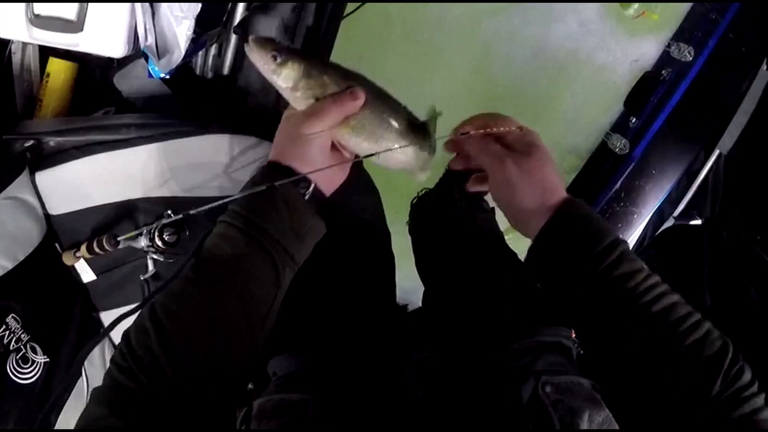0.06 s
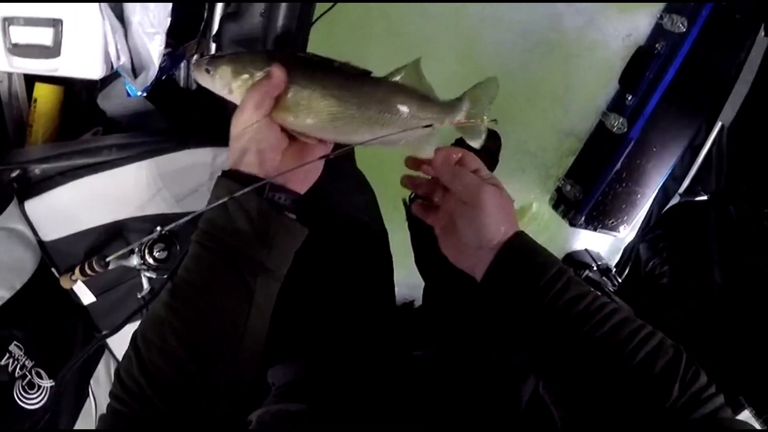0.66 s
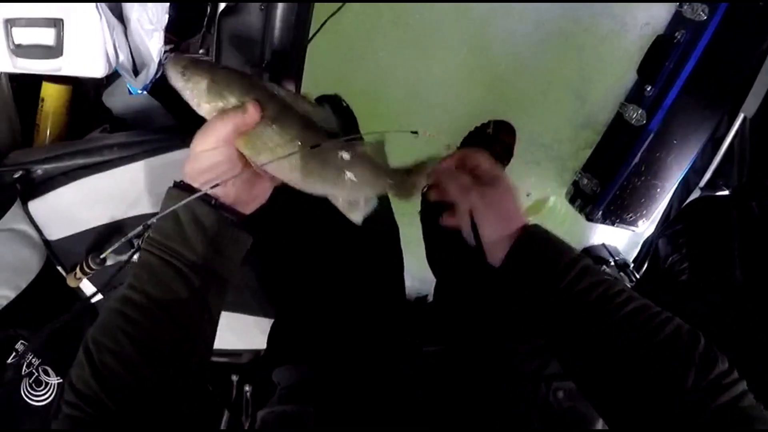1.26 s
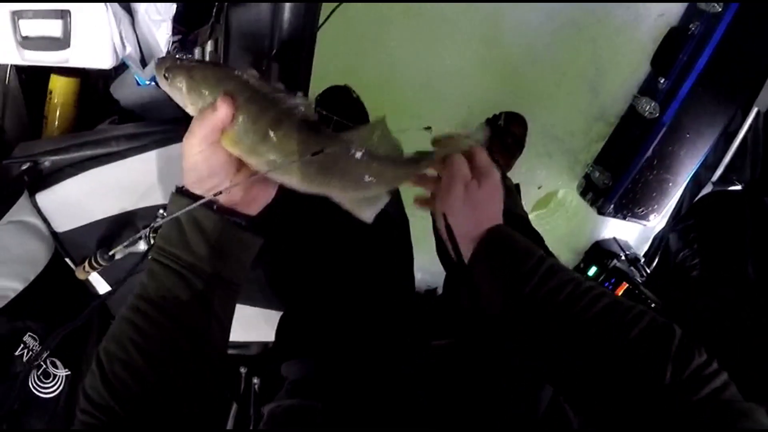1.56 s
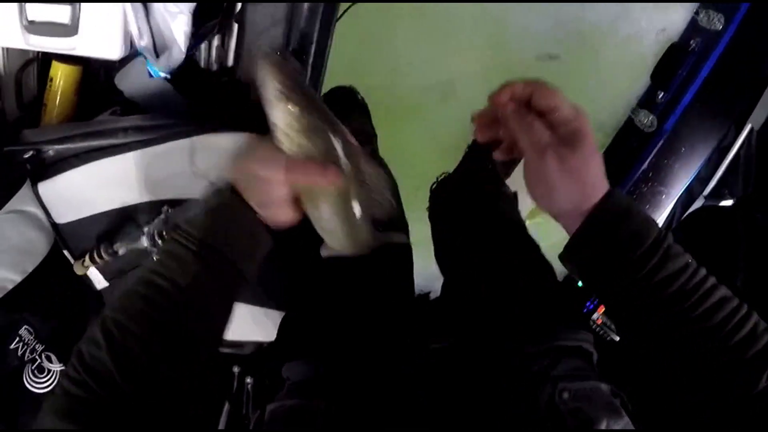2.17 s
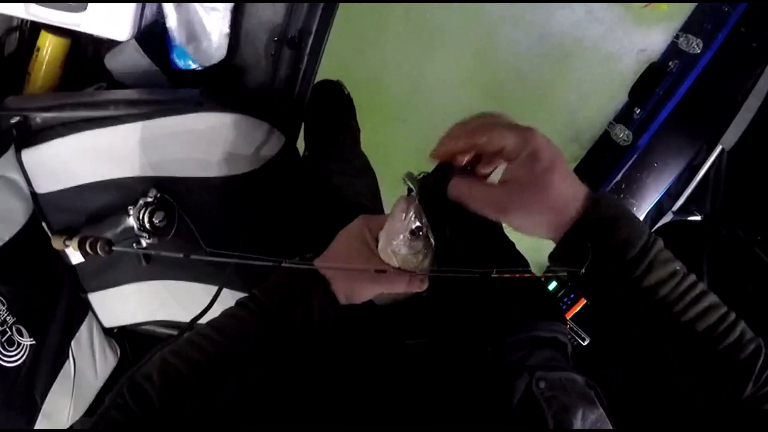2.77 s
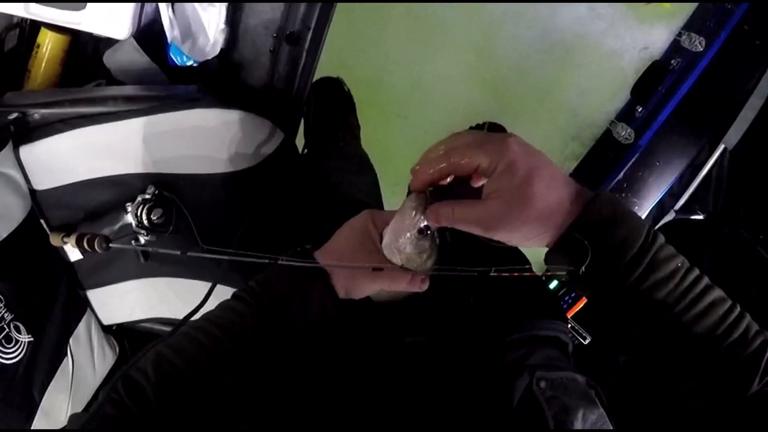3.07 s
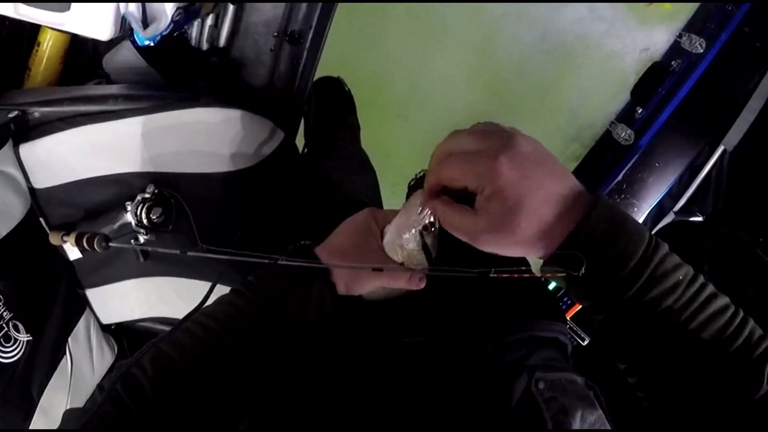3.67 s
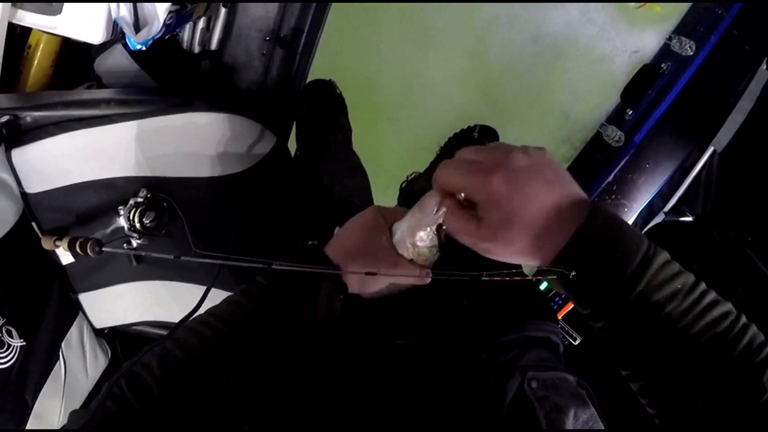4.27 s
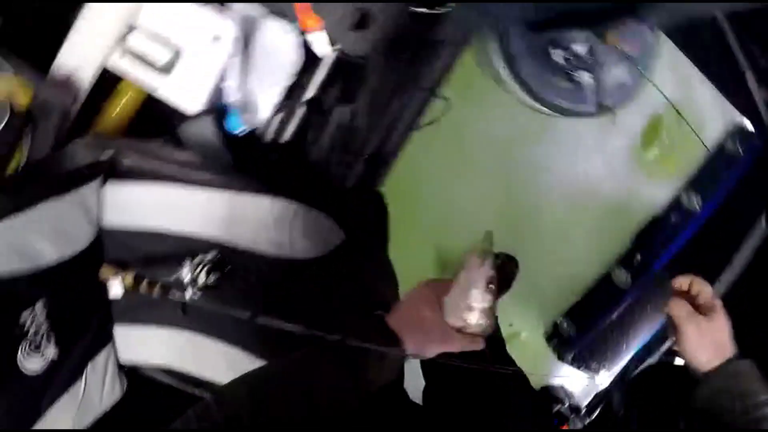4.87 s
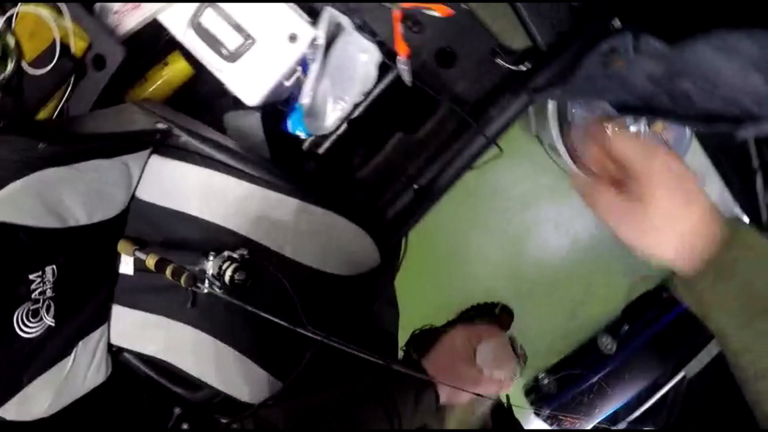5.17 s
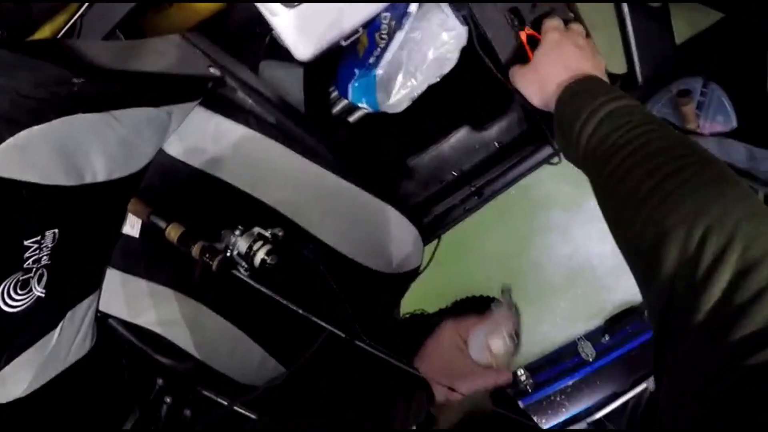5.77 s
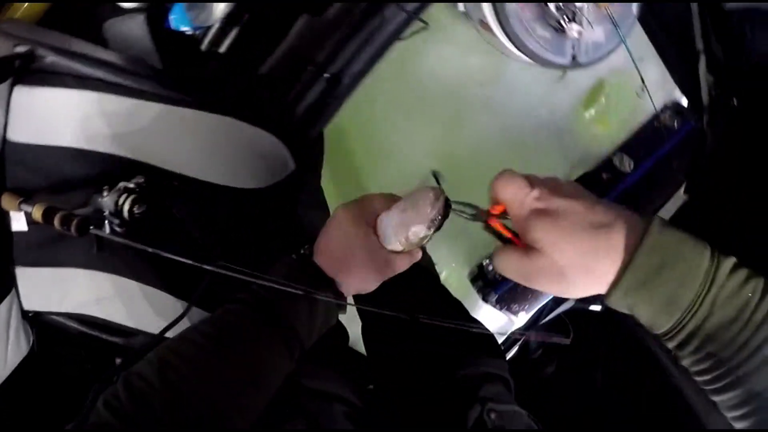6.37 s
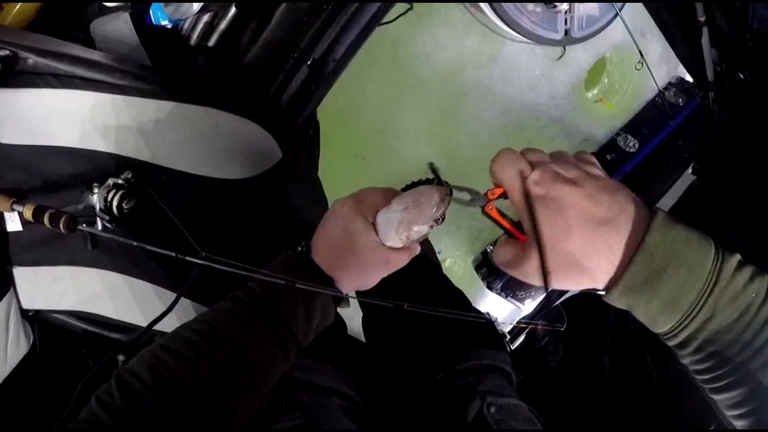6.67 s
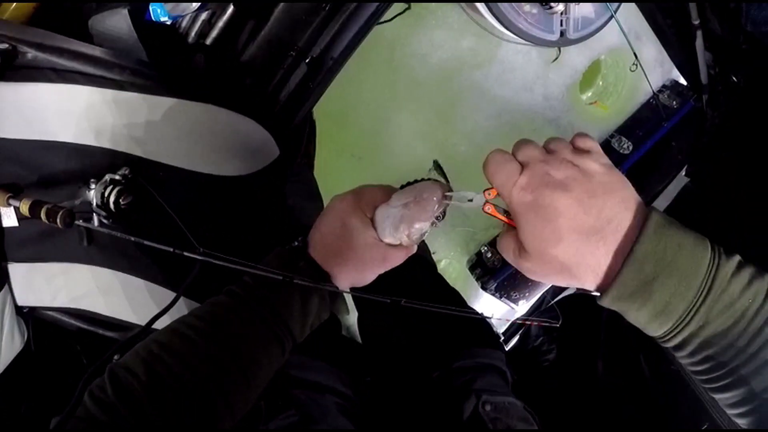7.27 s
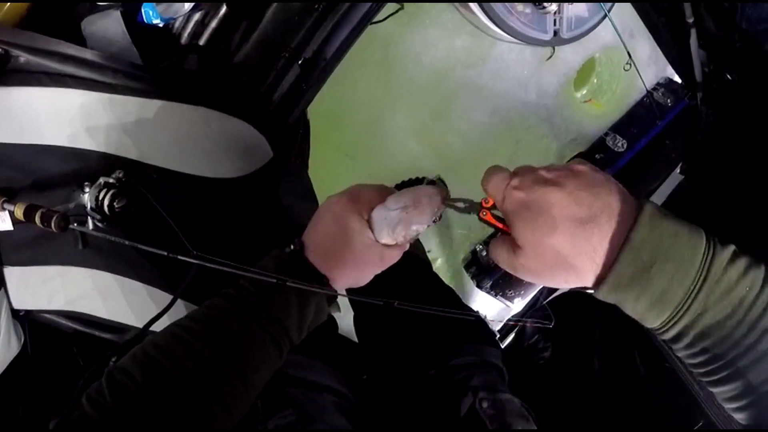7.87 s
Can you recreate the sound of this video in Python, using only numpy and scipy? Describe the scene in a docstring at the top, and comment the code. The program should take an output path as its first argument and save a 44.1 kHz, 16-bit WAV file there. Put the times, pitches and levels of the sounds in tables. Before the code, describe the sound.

Stiff clothing rustles and scuffs right against a body-worn microphone as an angler unhooks a fish in a small shelter. The mount bumps and briefly groans on the cloth, while line and hook give small clicks. Past the middle, pliers scrape and knock on a hollow plastic tray. The handling then thins to a few plier clicks. A low rumble continues throughout.

```python
"""Unhooking a fish in an ice shelter

An angler in a small fabric shelter holds a fish, fetches pliers and works the hook out, over a low rumble.
Stiff clothing rustles and scuffs by a body-worn camera; its mount bumps and groans on the cloth.
Line, hook and pliers click. Scrapes and knocks ring a plastic tray as the pliers are fetched."""
import sys
import numpy as np
from scipy import signal
from scipy.fft import rfft, irfft, next_fast_len
from scipy.io import wavfile
from scipy.ndimage import uniform_filter1d, minimum_filter1d, map_coordinates

SR = 44100
rng = np.random.default_rng(int(sys.argv[2]) if len(sys.argv) > 2 else 0)


def put_to_file(sound):
    """Save the sound as 16-bit audio at rate SR, in the file named by the first command-line argument."""
    columns = np.atleast_2d(sound).T  # one column per channel
    safe = np.clip(columns, -1, 1)
    whole_steps = np.round(safe * 32767)
    wavfile.write(sys.argv[1], SR, whole_steps.astype(np.int16))


N = 353682

# Event levels are relative within each source.
# body leans: t/s, length/s, added rumble re rest/dB
BODY_LEANS = [(3.11, 0.1, 5), (3.3, 0.072, -5), (4.58, 0.38, -4), (5.4, 0.16, 3.5)]
# sleeve rustle as the arms move: t/s, level/dB
SLEEVE_LEVELS = [(0.0, -54.5), (0.8, -51.5), (1.2, -46), (1.5, -52.5), (2.0, -47), (2.3, -56), (2.9, -59),
                 (3.25, -39.5), (3.58, -58.5), (4.45, -50.5), (4.72, -52.5), (5.3, -45.5), (5.8, -47),
                 (6.25, -55), (6.6, -60), (6.95, -53), (7.3, -61), (8.02, -49.5)]
# cloth or gear snaps that bump the mount: t/s, snap/dB, brightness/dB, bump/dB
MOUNT_JOLTS = [(0.114, -44, -37, -12), (0.2685, -32, -27, -23.5), (0.4909, -24, -6, -8.5),
               (0.519, -33, -12, -11), (0.8948, -22, -10.5, -10.5), (1.1303, -26, -16, -4.5),
               (1.181, -33, -1, -7.5), (1.31, -28, -29, -6), (1.3304, -15.5, -16.5, -11),
               (1.352, -22.5, -9.5, -5), (1.4783, -27.5, -18, -16), (1.7094, -22.5, -12, -17),
               (1.722, -18, -8, -4.5), (1.785, -26, -2, -8), (1.928, -27.5, 0.5, -9),
               (2.8946, -30.5, -8, -9), (3.0958, -31, -2.5, -9.5), (3.1622, -20, -6, -5.5),
               (3.2006, -15, -9, -9), (3.274, -38, -13, -2.5), (3.302, -13.5, -6, -7.5),
               (3.383, -25.5, -2.5, -5.5), (3.5037, -29.5, -6, -11), (3.635, -28, -7.5, -11),
               (3.8031, -18.5, -3.5, -7), (4.039, -20.5, -7, -10), (4.3908, -27, -14, -18),
               (4.439, -31, -6.5, -9), (4.568, -34, -33, -10.5), (4.6525, -23.5, -11, -10.5),
               (4.8, -21, -10, -18), (4.847, -27, -6.5, -18), (4.8649, -22, -28, -5.5),
               (4.922, -25.5, -13, -16), (5.002, -36, -9, -22), (5.218, -33, -7.5, -15.5),
               (5.3324, -31, -12, -15), (5.3814, -15, -24, -4), (5.454, -19, -7, -15),
               (5.4681, -19, -2, -6.5), (5.536, -25.5, -11, -1.5), (5.8934, -21.5, -10.5, -5.5),
               (5.9423, -29.5, -4, -7), (5.985, -31.5, -13, -17), (6.448, -24, -12, -6),
               (6.4846, -25, -11.5, -9.5), (6.6331, -38.5, -8, -42), (6.695, -34, -11, -26),
               (6.7064, -26, -14, -18.5), (6.792, -25.5, -6, -21), (7.069, -30, -6, -7.5)]
# line, hook and pliers: t/s, level/dB, brightness/dB
GEAR_CLICKS = [(0.3024, -32, -7), (1.167, -36, -1), (1.2151, -18, -2.5), (1.2654, -22, -5.5),
               (2.0242, -19, 2.5), (2.1661, -32.5, -14), (2.506, -32.5, -2), (2.6854, -25, 0),
               (3.0235, -32.5, -1), (3.4097, -25.5, -0.5), (3.4418, -29, -6), (3.7321, -27, -41),
               (4.0792, -21.5, -7.5), (4.2014, -33.5, 2), (4.3532, -17.5, -5), (4.6174, -19, -2),
               (5.115, -35, 0.5), (5.504, -18, -14), (5.5634, -14, -2.5), (5.5997, -21, -20),
               (5.643, -30.5, -22), (5.7438, -31, -25), (5.7618, -29.5, -27), (6.0125, -30, -7),
               (6.4463, -13.5, -10.5), (6.5804, -38.5, -11), (6.764, -18, -6.5), (6.9627, -19.5, -4.5),
               (7.0623, -10.5, -8.5), (7.188, -23, -5.5), (7.4678, -27.5, 1)]
# cloth on cloth: t/s, length/s, boom/dB, rasp/dB, hiss/dB
CLOTH_SCUFFS = [(0.3, 0.045, -32, -51, -49), (0.485, 0.038, -17.5, -36, -44), (0.54, 0.15, -23, -47.5, -56),
                (1.13, 0.11, -12, -35, -35.5), (1.32, 0.048, -9.5, -28, -42),
                (1.38, 0.081, -19.5, -64, -58), (1.72, 0.04, -13, -31.5, -32.5),
                (1.775, 0.061, -11.5, -30, -32), (1.91, 0.082, -13, -34.5, -39),
                (2.0, 0.1, -10.5, -29.5, -32.5), (2.12, 0.065, -19, -40.5, -45),
                (2.28, 0.084, -24, -41.5, -49), (2.35, 0.071, -17.5, -34.5, -49),
                (2.47, 0.16, -25, -43.5, -52.5), (2.57, 0.16, -17, -38.5, -44.5),
                (2.85, 0.056, -20.5, -47, -55.5), (3.1, 0.15, -17.5, -32.5, -34.5),
                (3.2, 0.07, -10.5, -35, -37), (3.33, 0.11, -18.5, -43, -52), (3.62, 0.021, -25, -32.5, -39),
                (3.725, 0.064, -16.5, -29.5, -30), (3.8, 0.049, -12.5, -29, -36),
                (3.98, 0.1, -32, -42.5, -50), (4.035, 0.038, -14, -38, -38.5),
                (4.33, 0.07, -25.5, -43.5, -41), (4.46, 0.023, -33, -58, -49),
                (4.565, 0.079, -18, -37, -43.5), (4.85, 0.023, -11, -36, -34),
                (5.335, 0.11, -15.5, -39.5, -36), (5.46, 0.037, -16.5, -29, -32),
                (5.525, 0.02, -10.5, -27.5, -34.5), (5.59, 0.04, -22, -33, -50.5),
                (6.05, 0.079, -15, -32.5, -40.5), (6.17, 0.34, -29.5, -41, -55.5),
                (6.335, 0.075, -19, -32.5, -41), (6.44, 0.033, -20, -32, -44),
                (7.47, 0.093, -42, -55.5, -46.5), (7.64, 0.068, -48, -60, -47.5),
                (7.9, 0.1, -47, -68, -46.5)]
# mount dragging on cloth: t/s, length/s, level/dB, start f/Hz, end f/Hz
MOUNT_GROANS = [(1.765, 0.083, -10, 163, 173), (1.9, 0.14, -14, 173.6, 211),
                (2.07, 0.087, -18.5, 179, 154.6), (2.295, 0.13, -12.5, 178.4, 157),
                (2.46, 0.14, -22, 171.4, 163.8), (2.58, 0.177, -11.5, 157.6, 102),
                (2.845, 0.054, -13.5, 136.5, 114)]
# slides over the tray: t/s, length/s, low modes/dB, high modes/dB, favoured f/Hz
TRAY_SCRAPES = [(4.859, 0.12, -31.5, -51, 480), (5.57, 0.17, -26.5, -36, 233),
                (5.901, 0.061, -17.5, -39, 251), (5.989, 0.056, -19.5, -38.5, 266),
                (6.05, 0.056, -16, -26, 408), (6.168, 0.23, -24.5, -31.5, 306)]
# blows on the tray: t/s, level/dB, low-mode balance/dB, favoured f/Hz
TRAY_KNOCKS = [(4.863, -14, 7, 1130), (5.004, -33.5, 20.5, 930), (5.381, -23, -12, 764),
               (5.504, -9, -17, 930), (5.536, -12, 10, 767), (5.586, -10, -10, 780), (5.599, -11, -3, 700),
               (5.642, -12.5, -34, 855), (5.727, -31, 5, 754), (5.894, -8, 11, 589),
               (5.984, -18.5, 13, 813), (6.06, -31, -5, 635), (6.168, -22, -7, 676)]
# tray modes: f/Hz, width/Hz, level/dB
TRAY_LOW_MODES = [(235.3, 14.6, 2), (286.7, 17.3, 0), (390, 5.9, 3.5), (477, 5.4, -15)]
TRAY_HIGH_MODES = [(615, 8.3, -9.5), (671, 33, 7.5), (763, 22, 4.5), (824, 35, 6), (852, 17, 1),
                   (937, 53, -2), (1154, 51, -4), (1458, 10, 0)]
# noise spectra: f/Hz, level/dB
RUMBLE_SPECTRUM = [(15, -58), (28, -1.5), (45, 5), (65, -1), (95, 4.5), (130, -5), (200, -11.5), (280, -16),
                   (400, -26.5), (600, -39), (1200, -67), (3000, -120)]
AIR_SPECTRUM = [(100, 6.5), (500, -3.5), (1000, 3), (2200, 0), (4700, -20), (6500, -20), (8000, -6),
                (11000, -15), (15000, -24.5)]
SLEEVE_SPECTRUM = [(200, -35), (700, 6.5), (1500, 0), (3500, -3.5), (4900, -7.5), (6500, 2.5), (7600, -2.5),
                   (9500, -14), (11500, -23), (15000, -38)]
CLICK_SPECTRUM = [(150, -19), (450, -0.5), (900, 2.5), (1500, 1.5), (2300, -1.5), (3000, -3), (4000, -6),
                  (5000, -5), (6400, 3), (7500, -1.5), (9000, -13), (11000, -24.5), (15000, -30)]
BOOM_SPECTRUM = [(50, -43), (110, -2.5), (170, -1.5), (290, -1.5), (400, -11.5), (560, -26.5), (1000, -39),
                 (2000, -120)]
RASP_SPECTRUM = [(200, -35), (500, 2.5), (850, 9.5), (1250, 2.5), (1700, 2.5), (2500, -7), (4000, -24),
                 (7000, -20), (12000, -64)]
HISS_SPECTRUM = [(800, -22), (2500, 1.5), (3800, -2.5), (5000, -3.5), (6400, -1), (7500, -1.5),
                 (9000, -15.5), (11000, -28), (15000, -37)]
# likeness of the two microphone ports: f/Hz, correlation
PORT_LIKENESS = [(25, 0.44), (60, 1), (280, 0.97), (450, 0.55), (800, 0.073), (1400, 0.07), (2500, 0.033),
                 (3500, 1), (4700, 0.34), (7000, 0.028), (14000, 0.067)]
# left port over right: f/Hz, level/dB
PORT_BALANCE = [(30, -1), (80, 0.44), (380, 1.1), (700, 2), (1100, 3), (2000, 2.5), (3200, 1), (4300, 3),
                (6800, 3), (8300, -3), (10000, -2), (14000, 2.5)]
# right port behind left: f/Hz, lag/s
PORT_LAG = [(600, 0), (1300, .00025)]


def amp(db):
    """Decibels to gain."""
    return np.exp(np.asarray(db) * np.log(10) / 20)


def unit(x):
    """x at rms 1."""
    return x / np.sqrt(np.mean(x ** 2) + 1e-20)


def unit_peak(x):
    """x at peak 1."""
    return x / np.abs(x).max()


def along(points, hz):
    """Curve read on a log frequency axis."""
    f, values = np.transpose(points)
    return np.interp(np.log(hz + 1), np.log(f + 1), values)


def wobble(rate_hz):
    """Smooth random curve."""
    knots = rng.standard_normal(int(N * rate_hz / SR) + 4)
    return map_coordinates(knots, [np.arange(N) * rate_hz / SR])


def decay(t, t60_s):
    """Fall of 60 dB in t60_s."""
    return np.exp(-np.log(1000) * t / t60_s)


def add(track, start_s, sound):
    """Mix a sound into a track."""
    part = track[..., max(round(start_s * SR), 0):][..., :sound.shape[-1]]
    part += sound[..., :part.shape[-1]]


def filtered(x, response):
    """x through a complex frequency response."""
    size = x.shape[-1]
    padded = next_fast_len(size + 2048, real=True)
    return irfft(rfft(x, padded) * response(np.fft.rfftfreq(padded, 1 / SR)), padded)[..., :size]


def patchy(depth_db, size):
    """Two white noises; narrow resonances come and go as folds and air pockets change shape."""
    hop = 256
    field = uniform_filter1d(rng.standard_normal((size // hop + 2, hop + 1)), size=2, axis=1)
    field = uniform_filter1d(field, size=11, axis=0)
    spectra = rfft(rng.standard_normal((2, len(field), 2 * hop), dtype=np.float32))
    frames = irfft(spectra * amp(depth_db * unit(field))) * np.sqrt(np.hanning(2 * hop))
    return (frames[:, 1:, :hop] + frames[:, :-1, hop:]).reshape(2, -1)[:, :size]


def port_noise(colour_db, patchy_db, size):
    """Coloured noise, partly alike at the two ports; mid at rms 1."""
    def mid_side_gains(hz):
        likeness = np.clip(along(PORT_LIKENESS, hz), -1, 1)
        return amp(colour_db(hz)) * np.sqrt([1 + likeness, 1 - likeness])
    mid, side = filtered(patchy(patchy_db, size), mid_side_gains)
    return np.array([mid + side, mid - side]) / np.std(mid)


def noise(spectrum, patchy_db=0):
    """Scene-long stereo noise."""
    return port_noise(lambda hz: along(spectrum, hz), patchy_db, N)


def crinkle(rate_hz, spread_db, t60_s):
    """Envelope of many tiny decaying snaps."""
    onsets = rng.random(N) < rate_hz / SR
    energy = onsets * amp(spread_db * np.clip(rng.standard_normal(N), -2, 2)) ** 2
    pole = amp(-60 / (t60_s * SR)) ** 2
    return unit(np.sqrt(signal.lfilter([1], [1, -pole], energy)))


def swell(length_s, attack_s, t60_s, arch_db):
    """Stroke envelope: rise, arch (sag if negative), decay."""
    t = np.arange(int((length_s + t60_s) * SR)) / SR
    pressure_db = arch_db * (np.sin(np.pi * np.minimum(t / length_s, 1)) - 2 / np.pi)
    return np.minimum(t / attack_s, 1) * amp(pressure_db) * decay(np.maximum(t - length_s, 0), t60_s)


def strokes(rows, attack_s, t60_s, arch_db):
    """Gain curves of a series of strokes, one per dB column."""
    gains = np.zeros((len(rows[0]) - 2, N))
    for start_s, length_s, *levels_db in rows:
        add(gains, start_s, amp(levels_db)[:, None] * swell(length_s, attack_s, t60_s, arch_db))
    return gains


def rumble():
    """Low rumble, swelling as the body leans."""
    lean, = strokes(BODY_LEANS, attack_s=0.027, t60_s=0.14, arch_db=2.5)
    rest_db = -21.5 + 1.43 * wobble(14)
    return amp(rest_db) * (1 + lean) * noise(RUMBLE_SPECTRUM)


def air():
    """Faint air hiss."""
    return amp(-55) * noise(AIR_SPECTRUM, patchy_db=3.5)


def sleeves():
    """Moving arms rustle the sleeves in dense, tiny snaps."""
    level_db = np.interp(np.arange(N) / SR, *np.transpose(SLEEVE_LEVELS))
    snaps = crinkle(rate_hz=870, spread_db=3, t60_s=0.069)
    return amp(level_db + 2.5) * snaps * noise(SLEEVE_SPECTRUM, patchy_db=2)


def contacts(rows, knock_db, t60_s):
    """Brief cracks, answered by close walls and gear. Soft contacts knock; hard ones are bright."""
    out, t = np.zeros((2, N)), np.arange(SR // 6) / SR
    envelope = (decay(t, t60_s) + 0.47 * decay(t, 0.007)) * (1 - np.exp(-t / 0.00059))
    for start_s, db, bright_db, *_ in rows:
        tilt = [(1000, knock_db + 2.5), (1900, 0.0056), (3600, 0),  # f/Hz, level/dB
                (5800, bright_db + 4.5), (13000, 2.26 * bright_db + 7)]
        colour_db = lambda hz: along(CLICK_SPECTRUM, hz) + along(tilt, hz)
        band_gain = np.sqrt(1 + amp(knock_db) ** 2 + amp(bright_db) ** 2)
        burst = port_noise(colour_db, patchy_db=2.7, size=len(t))
        add(out, start_s, amp(db - 5.5) * band_gain * envelope * burst)
    return out


def mount_bumps(db_per_octave=7):
    """A push rings the mount's damped modes; a harder push loads it more and rings lower."""
    out, t = np.zeros(N), np.arange(SR // 4) / SR
    modes = [(0.62, -5.5, 0.44), (0.98, 3, 0.17), (1.42, -2, 0.11), (1.85, -7.5, 0.092)]
    attack = 1 - np.exp(-t / 0.0016)
    for start_s, _, _, db in MOUNT_JOLTS:
        hz = np.clip(170.7 * 2 ** ((-7 - db) / db_per_octave), 121.5, 233.5)
        ring = 0
        for ratio, mode_db, t60_s in modes:
            envelope = amp(mode_db + rng.normal(0, 1)) * decay(t, t60_s)
            ring += envelope * np.sin(2 * np.pi * (hz * ratio * t + rng.random()))
        add(out, start_s, amp(db - 2) * unit_peak(ring * attack))
    return out


def cloth_scuffs():
    """Stiff cloth catches and lets go: one train of snaps drives boom, rasp and hiss."""
    boom, rasp, hiss = strokes(CLOTH_SCUFFS, attack_s=0.015, t60_s=0.2, arch_db=2)
    snaps = crinkle(rate_hz=330, spread_db=0, t60_s=0.11)
    treble = rasp * noise(RASP_SPECTRUM, patchy_db=2) + hiss * noise(HISS_SPECTRUM)
    smooth_snaps = uniform_filter1d(snaps, size=150)  # the boom follows the snaps, smoothed over a few milliseconds
    return snaps * treble + smooth_snaps * amp(-4.5) * boom * noise(BOOM_SPECTRUM, patchy_db=1)


def mount_groans():
    """Stick-slip of the mount on cloth: low glides, unsteady in pitch and level."""
    out, waver = np.zeros(N), 1 + 0.052 * wobble(70)
    for start_s, length_s, db, start_hz, end_hz in MOUNT_GROANS:
        envelope = swell(length_s, attack_s=0.0082, t60_s=0.26, arch_db=2)
        glide_hz = np.interp(np.arange(len(envelope)) / SR, [0, length_s], [start_hz, end_hz])
        hz = glide_hz * waver[round(start_s * SR):][:len(envelope)]
        add(out, start_s, amp(db) * envelope * np.sin(2 * np.pi * np.cumsum(hz) / SR))
    return out * amp(1.9 * wobble(45))


def softened(force, cutoff_hz=2400):
    """Plastic yields on contact: a low-pass."""
    return signal.sosfilt(signal.butter(2, cutoff_hz, fs=SR, output="sos"), force)


def ringing(drive, modes):
    """Drive through parallel resonances of alternating sign."""
    def response(f):
        return sum((-1) ** k * amp(db) * 1j * f * width_hz / (hz * hz - f * f + 1j * f * width_hz)
                   for k, (hz, width_hz, db) in enumerate(modes))
    return filtered(drive, response)


def favouring(modes, ring_hz, db_per_octave):
    """The spot touched favours modes near one pitch."""
    return [(hz, width_hz, db - db_per_octave * abs(np.log2(hz / ring_hz))) for hz, width_hz, db in modes]


def tray_scrapes():
    """Uneven slips ring the plastic tray."""
    out = np.zeros(N)
    slips = softened(crinkle(rate_hz=290, spread_db=3.5, t60_s=0.017) * rng.standard_normal(N))
    for start_s, length_s, low_db, high_db, ring_hz in TRAY_SCRAPES:
        envelope = swell(length_s, attack_s=0.013, t60_s=0.12, arch_db=-3)
        drive = slips[round(start_s * SR):][:len(envelope)]
        low = unit(ringing(drive, favouring(TRAY_LOW_MODES, ring_hz, db_per_octave=24)))
        high = unit(ringing(drive, TRAY_HIGH_MODES))
        add(out, start_s, envelope * (amp(low_db) * low + amp(high_db) * high))
    return out


def tray_knocks():
    """Hand and pliers strike the tray: hollow low modes, clacking high ones."""
    out, t = np.zeros(N), np.arange(SR // 4) / SR
    damping = decay(t, t60_s=0.4)
    for start_s, db, low_db, ring_hz in TRAY_KNOCKS:
        blow = softened(decay(t, t60_s=0.0049) * rng.standard_normal(len(t)))
        struck_modes = favouring(TRAY_HIGH_MODES, ring_hz, db_per_octave=5)
        hollow = unit_peak(ringing(blow, TRAY_LOW_MODES) * damping)
        clack = unit_peak(ringing(blow, struck_modes) * damping)
        add(out, start_s, amp(db - 5) * (amp(low_db - 2) * hollow + clack))
    return out


def port_response(hz):
    """The left port hears the midrange sooner and louder."""
    side = np.array([[0.5], [-0.5]])
    return amp(side * along(PORT_BALANCE, hz)) * np.exp(2j * np.pi * hz * side * along(PORT_LAG, hz))


def scene():
    """All sources at the two ports."""
    mix = rumble() + air() + sleeves()
    mix += contacts(MOUNT_JOLTS, knock_db=1.5, t60_s=0.14) + mount_bumps()
    mix += contacts(GEAR_CLICKS, knock_db=-11, t60_s=0.12)
    mix += cloth_scuffs() + mount_groans() + tray_scrapes() + tray_knocks()
    return filtered(mix, port_response)


def record(dry, ceiling=0.95, top_hz=15300):
    """Camera peak limiter, then band limit."""
    needed = np.minimum(1, ceiling / (np.abs(dry).max(axis=0) + 1e-9))
    gain = uniform_filter1d(minimum_filter1d(needed, size=441), size=441)
    return filtered(dry * gain, lambda hz: hz < top_hz)


dry = scene()
out = record(dry)
put_to_file(out)
```